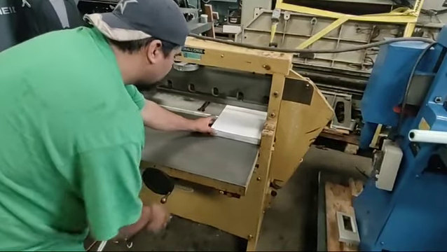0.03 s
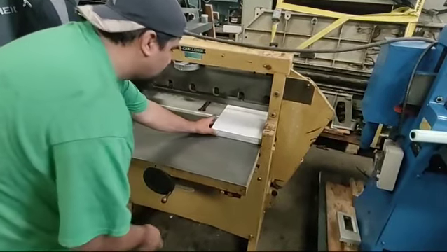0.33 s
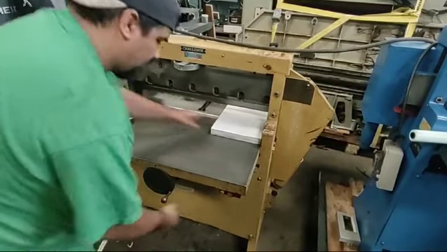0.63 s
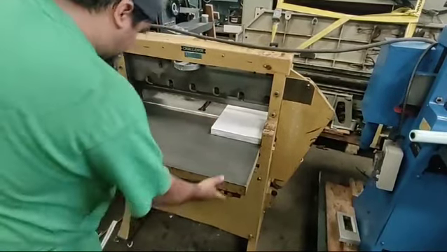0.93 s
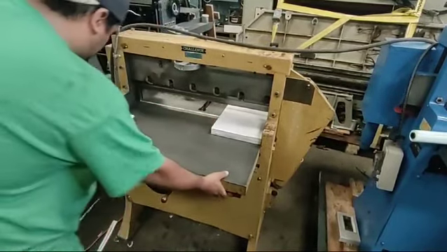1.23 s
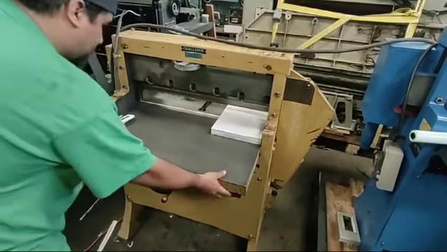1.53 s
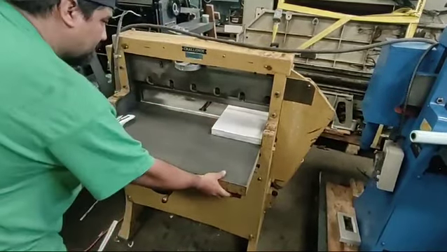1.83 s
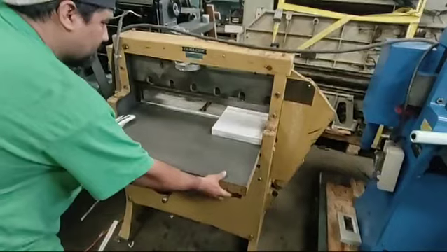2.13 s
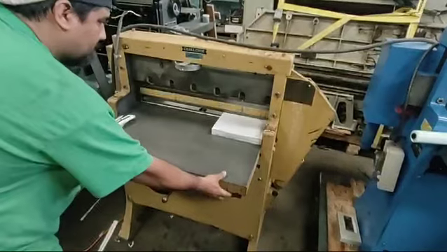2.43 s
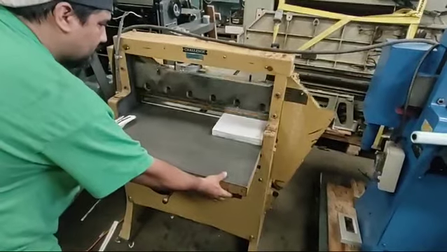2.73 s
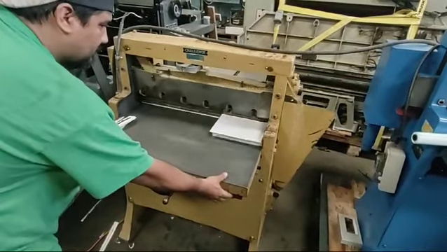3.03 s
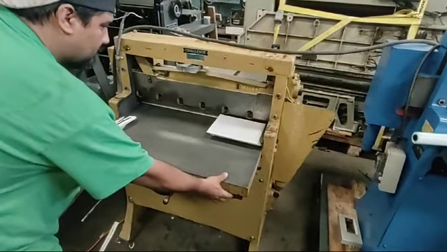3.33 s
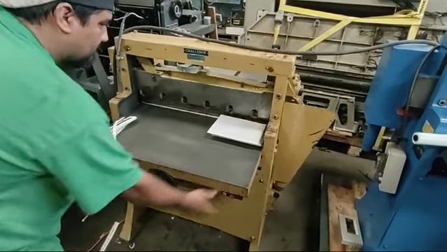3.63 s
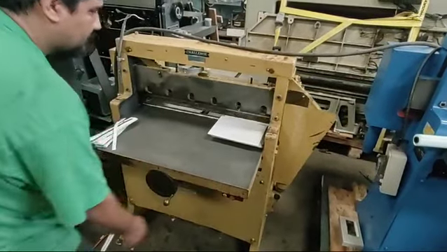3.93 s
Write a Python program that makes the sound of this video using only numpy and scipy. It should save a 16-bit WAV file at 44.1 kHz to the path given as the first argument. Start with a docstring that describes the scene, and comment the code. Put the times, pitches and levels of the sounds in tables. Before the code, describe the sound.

A hydraulic paper cutter hums, clunks, then crunches through a paper stack and hisses.

```python
"""A hydraulic paper guillotine idles in a workshop, its vane pump humming; a sleeve rustles.
The valve is thrown, the clamp clunks down, booming in the steel frame, and the pump labours.
The blade crunches through the stack and squeals as it sticks and slips. Oil hisses through the
relief valve at the bottom of the stroke, and a last clunk starts the return."""
import sys
import numpy as np
from scipy import signal
from scipy.fft import rfft, irfft
from scipy.io import wavfile

SR = 44100
rng = np.random.default_rng(int(sys.argv[2]) if len(sys.argv) > 2 else 0)


def wav_record(signal):
    """Record a signal, one row per channel, as 16-bit PCM in the file named by sys.argv[1]."""
    frames = np.transpose(np.atleast_2d(signal))
    bounded = np.clip(frames, -1, 1)
    # unit amplitude maps onto the largest positive 16-bit level
    quanta = np.round(bounded * 32767).astype(np.int16)
    wavfile.write(sys.argv[1], SR, quanta)


N = 176400
T = np.arange(N) / SR

# how alike left and right are: f/Hz, likeness (0 wide, 1 centred; clipped to that range for noise)
LIKENESS = [(250, 1.29), (600, 2.02), (1200, -0.13), (2600, -0.52), (6000, -0.13)]


def from_db(db):
    """Gain of a level in dB."""
    return 10 ** (np.asarray(db) / 20)


def rms_one(x):
    """Scale to an rms of one."""
    return x / np.sqrt(np.mean(x ** 2) + 1e-20)


def in_time(rows):
    """Each column of an automation curve at every sample."""
    times, *columns = np.transpose(rows)
    return [np.interp(T, times, column) for column in columns]


def at_hz(points, hz):
    """Read a curve on a log-frequency axis."""
    f, value = np.transpose(points)
    return np.interp(np.log(np.maximum(hz, 1)), np.log(f), value)


def drift(rate_hz):
    """Smooth random wander with a spread of one."""
    pole = np.exp(-40 * np.pi * rate_hz / SR)  # runs at SR / 20
    slow = signal.lfilter([1], [1, -2 * pole, pole * pole], rng.standard_normal(N // 20 + 2002))[2000:]
    return np.interp(np.arange(N) / 20, np.arange(len(slow)), rms_one(slow))


def envelope(start, attack, end, t60):
    """Rise, hold until the end, then die away; all in seconds."""
    return np.clip((T - start) / attack, 0, 1) * np.exp(-np.log(1000) * np.maximum(T - end, 0) / t60)


def sides(hz):
    """Left and right gains at these frequencies."""
    # stereo balance: f/Hz, left minus right/dB
    balance = [(700, 1), (1600, -0.5), (2600, -8.5), (3800, -7.5), (5500, -2.5), (10000, 0.5)]
    gains = from_db(at_hz(balance, np.atleast_1d(hz)) * np.array([[.5], [-.5]]))
    return gains / np.sqrt(np.mean(gains ** 2, axis=0))


def coloured(spectrum, grain=1):
    """Stereo noise, made grainy if asked, with the given colour; rms one."""
    hz = np.arange(N // 2 + 1) * SR / N
    mid, side = rfft(rng.standard_normal((2, N)) * grain)
    alike = np.clip(at_hz(LIKENESS, hz), 0, .995)
    pair = np.sqrt(1 + alike) * mid + np.sqrt(1 - alike) * side * [[1], [-1]]
    return rms_one(irfft(pair * sides(hz) * from_db(at_hz(spectrum, hz)) * (hz > 20), N))


def tone(turns, hz, lag_s=.00005):
    """A stereo sine of rms one; the room sets the two sides apart in phase."""
    apart = rng.normal() * (1 - at_hz(LIKENESS, hz)) + 2 * np.pi * hz * lag_s / (1 + hz / 2000)
    phase = 2 * np.pi * (turns + rng.random())
    return np.sqrt(2) * sides(hz) * np.array([np.sin(phase), np.sin(phase + apart)])


def pump(load, stalled, vanes=10, waver_db=1.0, wander=0.00047, chuff=0.036):
    """The vanes hum over the motor's shaft tones; shop and oil noise pulse twice a turn."""
    # pump speed, sagging under load: t/s, vane rate/Hz
    speed = [(2.19, 298.5), (2.33, 293.7), (2.48, 296.8), (2.68, 293), (3.2, 292.1), (3.3, 283.3),
             (3.57, 283.5), (3.63, 292.9), (3.78, 296.2)]
    # vane hum: harmonic, idling/dB, driving the ram/dB, against the relief valve/dB
    vane_tones = [(1, -55, -28, -46), (2, -38, -36, -25), (3, -62, -37.5, -50), (4, -56, -52, -32),
                  (5, -90, -40, -36.5), (6, -56.5, -51.5, -33.5), (7, -54.5, -48.5, -37.5),
                  (8, -86, -49.5, -33.5), (9, -53.5, -61, -37), (10, -59.5, -48.5, -69),
                  (11, -97, -53, -50), (13, -123, -53.5, -46.5)]
    # strong motor tones: multiple of the shaft rate
    motor_orders = [5, 12, 16, 22, 24, 29, 31, 42, 44]
    # the same tones at idle: level/dB
    motor_levels = [-52.5, -50, -57.5, -52, -53, -59, -55.5, -65, -68]
    # rattling buzz of the weaker shaft tones: f/Hz, level per tone/dB
    buzz = [(90, -72), (300, -65), (650, -56), (1000, -78), (1800, -68), (2700, -73), (3300, -91)]
    # colour of the motor and shop noise: f/Hz, level/dB
    shop = [(25, -25), (70, -1), (170, -3), (550, -4.5), (1100, -8), (2600, -10.5), (3600, -19.5),
            (7000, -29), (15000, -33)]
    # colour of oil flowing to the ram: f/Hz, level/dB
    flow = [(30, -41), (80, -3.5), (220, -3), (480, -1), (700, -8), (1200, -6), (1800, -6), (2500, -9.5),
            (3800, -18), (4700, -29.5), (9000, -40.5)]
    rate, = in_time(speed)
    turns = np.cumsum(rate * (1 + wander * drift(5.6))) / SR
    shaft, vane_hz = turns / vanes, rate.mean()
    valve_open = T > speed[0][0]
    out = np.zeros((2, N))
    for k, idle_db, drive_db, relief_db in vane_tones:
        idle = from_db(idle_db) * (1 - np.minimum(load + stalled, 1))
        drive = from_db(drive_db) * valve_open * load ** (1 + 1 / k)
        level = idle + drive + from_db(relief_db) * stalled
        out += level * from_db(waver_db * drift(13.7)) * tone(k * turns, k * vane_hz)
    motor_db = dict(zip(motor_orders, motor_levels))
    strain = 1 + (from_db(5.5) - 1) * load  # the buzz grows under load
    for k in range(3, 112):
        hz, scatter_db = k * vane_hz / vanes, rng.normal(0, 0.44)
        if k in motor_db:
            out += from_db(motor_db[k] + waver_db * drift(5.6)) * np.sqrt(strain) * tone(k * shaft, hz)
        elif k % vanes:
            out += from_db(at_hz(buzz, hz) + scatter_db) * strain * tone(k * shaft, hz)
    noise = from_db(-49) * coloured(shop) + from_db(-34) * load * coloured(flow)
    return out + noise * (1 + chuff * np.sin(4 * np.pi * shaft))


def shelves(hz, bass_db, treble_db):
    """Shelving EQ that makes one blow deeper or brighter than the next."""
    return from_db(at_hz([(160, bass_db), (300, 0), (700, 0), (3000, treble_db)], hz))


def clunks(rattle_db=3, attack_s=0.0071, t60_s=0.089, room_db=-7, rumble_lag_s=0.054, rumble_hz=87):
    """Each blow is a short rattle that booms in the frame, rings the steel and dies away in the shop."""
    # blows on the frame: t/s, level/dB, bass/dB, treble/dB, length/s
    blows = [(2.163, -51, -10, 21.5, .01), (2.194, -34.5, -8, 13.5, 0.014), (2.207, -24, 5, -20, 0.0077),
             (2.285, -14.5, -2.5, -4, 0.01), (2.564, -18, 6, -0.5, 0.021), (3.015, -19.5, -2, 17.5, 0.013),
             (3.028, -16, 4.5, -7, 0.01), (3.103, -23.5, 3, 9, 0.013), (3.243, -17.5, 11.5, -2, 0.0048),
             (3.577, -21, -5, 13, 0.011), (3.589, -18.5, 3, -71, 0.026)]
    # colour of the frame's boom: f/Hz, level/dB
    frame = [(35, -45), (70, -13.5), (110, -11.5), (170, -1.5), (280, 0), (470, -1), (690, -14.5),
             (900, -9), (1300, -8.5), (1800, -23.5), (2700, -11.5), (3000, -21.5), (3600, -24.5),
             (4700, -37.5), (5400, -36), (6500, -42.5), (9000, -50)]
    # reverb of the shop: f/Hz, t60/s
    room_t60 = [(70, 0.6), (300, 0.9), (8000, 0.42)]
    # ringing steel parts: f/Hz, level/dB, t60/s
    steel = [(226.9, -13, 0.35), (804, -24.5, 0.81), (860, -15, 0.3), (1458, -18.5, 0.12),
             (2087, -15.5, 0.051), (2627, -36, 0.17), (2696, -13, 0.067), (3230, -19.5, 0.11),
             (5210, -36.5, 0.18)]
    boom = rfft(coloured(frame, grain=from_db(rattle_db * np.tanh(drift(360)))))
    bins = np.arange(N // 2 + 1) * SR / N
    bursts = [(from_db(db) * envelope(start, attack_s, start + length, t60_s), bass, treble)
              for start, db, bass, treble, length in blows]
    out = np.zeros((2, N))
    for hz in 31.25 * 2 ** np.arange(10):
        octave = irfft(boom * np.maximum(1 - abs(np.log2((bins + 1) / hz)), 0), N)
        power = sum((burst * shelves(hz, bass, treble)) ** 2 for burst, bass, treble in bursts)
        decay = np.exp(-2 * np.log(1000) / (at_hz(room_t60, hz) * SR))
        tail = signal.lfilter([1 - decay], [1, -decay], power + 1e-18)
        late = rumble_lag_s / (1 + (hz / rumble_hz) ** 8)  # the deepest part swells late
        out += octave * np.interp(T - late, T, np.sqrt(power + 2 * from_db(room_db) * tail))
    for hz, mode_db, t60 in steel:
        mode = from_db(mode_db) * tone(hz * T, hz)
        for start, db, bass, treble, length in blows:
            ring = envelope(start, attack_s, start + length / 2, t60)
            out += from_db(db) * shelves(hz, bass, treble) * ring * mode
    return out


def blade(snaps_per_s=2700, snap_db=5, clump_db=2, jitter=0.048, flutter_db=3.5):
    """Sheets snap in a dense crunch; deep in the stack the blade sticks and slips in a rough squeal."""
    # crunch of the blade in the stack: t/s, level/dB
    cut = [(3.01, -30), (3.025, -19.5), (3.07, -29.5), (3.13, -26.5), (3.141, -20), (3.17, -20.5),
           (3.235, -24), (3.33, -29)]
    # colour of snapping paper: f/Hz, level/dB
    paper = [(100, -15), (350, -3.5), (650, -7.5), (950, 0.5), (1400, 2.5), (1800, -3), (2700, 2),
             (3050, -4.5), (3700, -1.5), (5000, -15), (9000, -25)]
    # stick-slip squeal: t/s, f/Hz, level/dB
    slip = [(3.13, 1142, -45), (3.141, 1207, -31), (3.157, 1179, -22), (3.167, 1146, -25),
            (3.18, 1192, -23), (3.226, 1196, -21), (3.238, 1159, -27), (3.252, 1130, -48)]
    cut_db, = in_time(cut)
    snaps = rng.random(N) < snaps_per_s / SR
    crunch = from_db(cut_db + clump_db * drift(120)) * coloured(paper, 1 + from_db(snap_db) * snaps)
    pitch, squeal_db = in_time(slip)
    turns = np.cumsum(pitch * (1 + jitter * drift(580))) / SR
    squeal = np.zeros((2, N))
    for k, harmonic_db in enumerate((-3.5, 1.5, -8, -22.5), 1):
        level = from_db(squeal_db + harmonic_db + flutter_db * drift(97))
        squeal += level * tone(k * turns, k * pitch.max())
    return crunch * (T > cut[0][0]) * (T < cut[-1][0]) + squeal * (T > slip[0][0]) * (T < slip[-1][0])


def relief_jet(start, attack, end, whistle_hz=5610, wander=.035, flicker_db=0.5):
    """Oil sprays through the relief valve with a wavering whistle while the ram is stalled."""
    # colour of the oil jet: f/Hz, level/dB
    jet = [(60, -20), (200, 1.5), (500, -1.5), (2500, 0), (3300, -5.5), (4800, -11.5), (5900, -4),
           (7400, -13.5), (10000, -11.5), (12500, -16.5)]
    direct = envelope(start, attack, end, t60=0.048)
    room = from_db(-9) * envelope(start, attack, end, t60=0.71)
    spray = np.hypot(direct, room)
    pitch = whistle_hz * (1 + wander * (drift(714) + drift(24.92)))
    whistle = tone(np.cumsum(pitch) / SR, whistle_hz)
    level = from_db(-26 + flicker_db * drift(60)) * spray
    return level * (coloured(jet) + from_db(-15) * spray * drift(180) * whistle)


def sleeve(flutter_db=2):
    """Cloth brushes softly as the arm draws back from the stack."""
    # brushes of the sleeve: t/s, half length/s, level/dB
    brushes = [(0.61, 0.079, -45.5), (0.903, 0.16, -53.5)]
    # colour of the cloth: f/Hz, level/dB
    cloth = [(300, -25), (2600, 14), (4000, -5.5), (12000, -20)]
    swell = sum(from_db(db) / (1 + ((T - peak) / width) ** 2) for peak, width, db in brushes)
    return swell * from_db(flutter_db * drift(25)) * coloured(cloth)


def scene():
    """The machine idles, clamps, cuts, stalls and starts its return."""
    # oil pressure, heard as the pump's effort: t/s, level/dB
    pressure = [(2.19, -15), (2.23, -5), (2.35, -4.5), (2.55, -3), (2.66, 0), (3.23, 1.5), (3.29, -6.5),
                (3.57, -7), (3.63, -1), (4, 0.5)]
    load = from_db(in_time(pressure)[0])
    stalled = envelope(start=3.28, attack=0.074, end=3.575, t60=0.19)
    hydraulics = pump(load, stalled) + relief_jet(start=3.206, attack=0.14, end=3.619)
    return hydraulics + clunks() + blade() + sleeve()


def record(dry, low_hz=47, top_hz=15850):
    """The microphones thin the deep bass; the top is cut steeply."""
    thin = signal.sosfilt(signal.butter(2, low_hz, "high", fs=SR, output="sos"), dry)
    return signal.sosfilt(signal.ellip(12, .1, 80, top_hz, fs=SR, output="sos"), thin)


dry = scene()
out = record(dry)
wav_record(out)
```